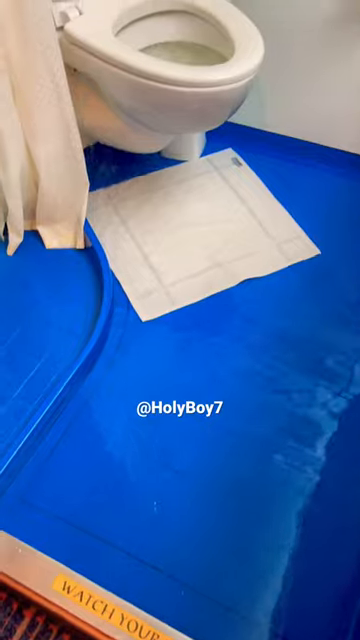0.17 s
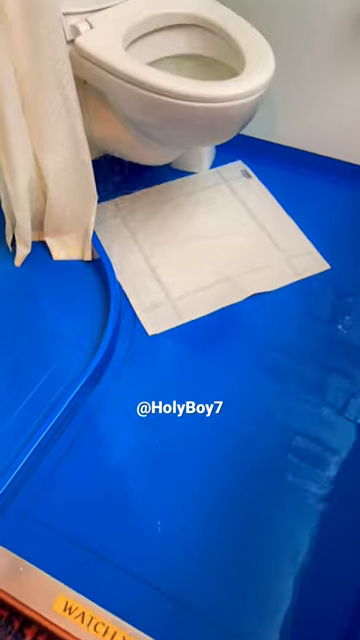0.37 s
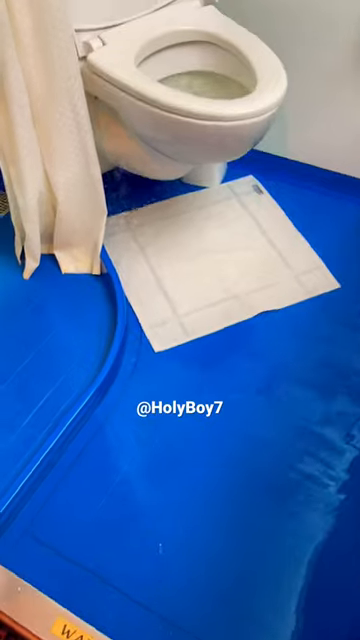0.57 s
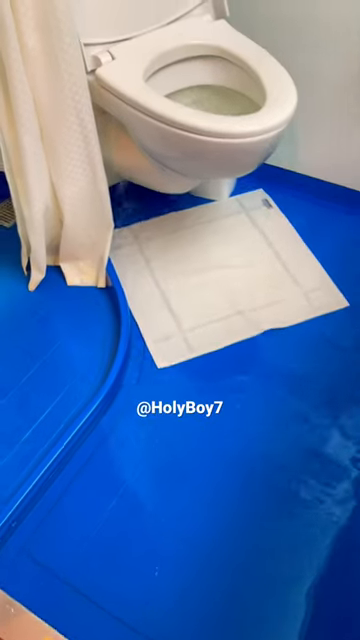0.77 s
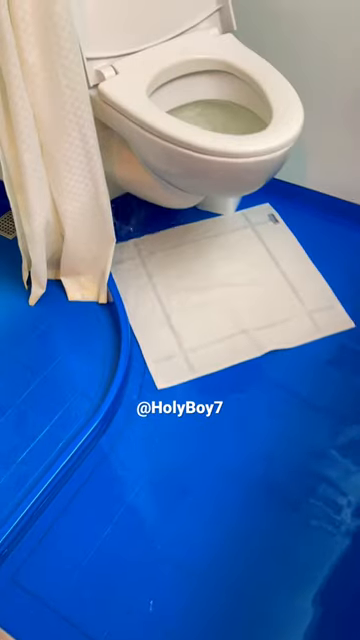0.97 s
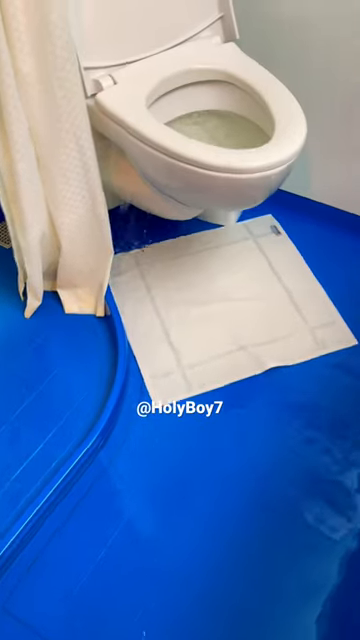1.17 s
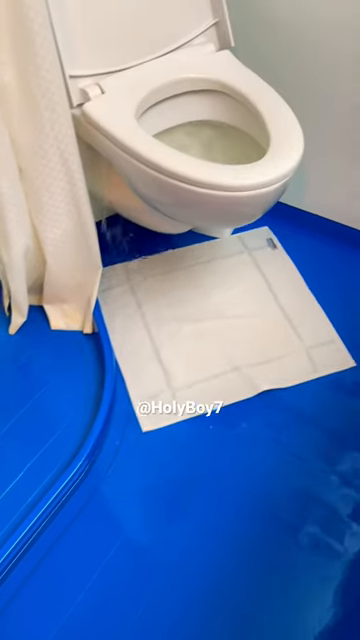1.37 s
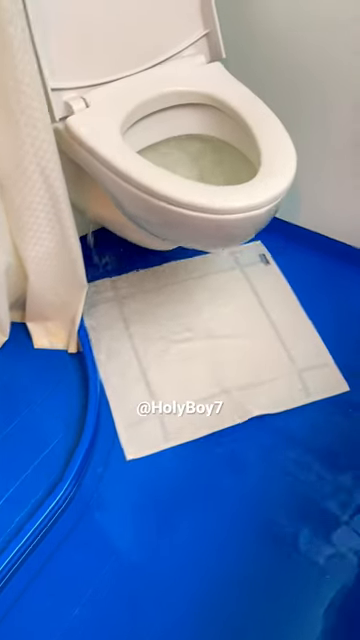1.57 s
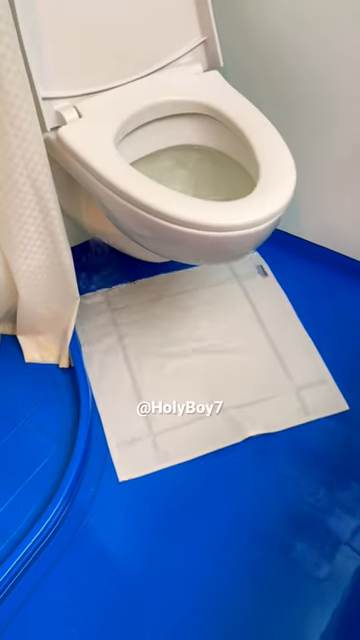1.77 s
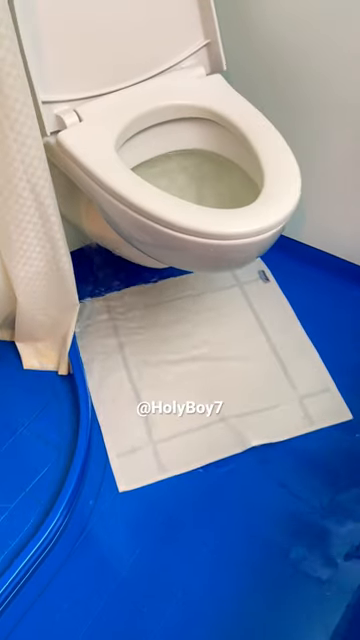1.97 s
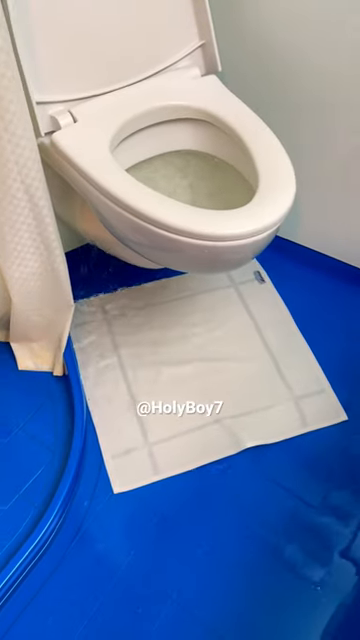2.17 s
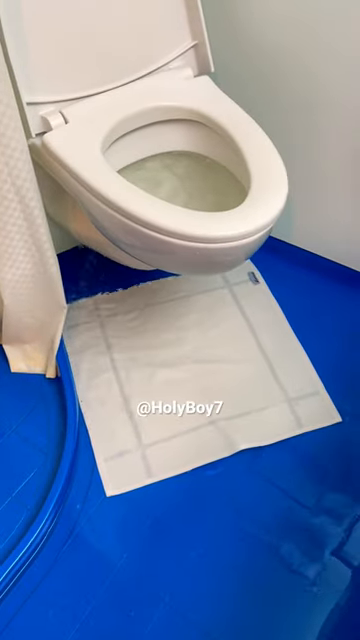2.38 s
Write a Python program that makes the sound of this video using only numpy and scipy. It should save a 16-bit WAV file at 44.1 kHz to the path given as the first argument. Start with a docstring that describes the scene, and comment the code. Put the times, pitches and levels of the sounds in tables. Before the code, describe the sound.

Overflowing toilet water hisses steadily, with bright drips, splats and bubbling glugs on a hard floor

```python
"""Water rushes into an overflowing toilet in a small, hard-walled bathroom, over a low rumble.
The inflow is coloured droplet clicks that hiss; noise rings in the bowl, and the filling pipe holds a hollow note.
The surface sloshes in surges of small rising tones, the bubbles, with a few deep glugs.
Spilled water drips as tones with ticks and splats as bursts of droplets; a close pair of microphone ports hears it.
"""
import sys
import numpy as np
from scipy import signal
from scipy.fft import rfft, irfft
from scipy.io import wavfile
from scipy.ndimage import uniform_filter1d

SR = 44100
rng = np.random.default_rng(int(sys.argv[2]) if len(sys.argv) > 2 else 0)


def generate_wav(sig):
    """Save sig (samples, or channels by samples) to the path in sys.argv[1] as 16-bit PCM at SR."""
    pcm = np.round(np.clip(np.atleast_2d(sig).T, -1, 1) * 32767).astype(np.int16)
    wavfile.write(sys.argv[1], SR, pcm)


N = 111132
T = np.arange(N) / SR
DRIP_RISE = 0.0033  # share of its pitch that a drip's tone rises per swell time


def undb(db):
    """Decibels to gain."""
    return 10 ** (np.asarray(db) / 20)


def unit(x):
    """Scale to rms 1."""
    return x / np.sqrt(np.mean(x ** 2) + 1e-18)


def follow(points):
    """A curve over time through (seconds, value) points."""
    seconds, values = np.array(points).T
    return np.interp(T, seconds, values)


def walk(rate):
    """Random levels held 1 / rate s, smoothed twice over that time and scaled to rms 1."""
    k = int(SR / rate)
    steps = np.repeat(rng.standard_normal(N // k + 1), k)
    return unit(uniform_filter1d(uniform_filter1d(steps, k), k)[:N])


def colour(x, points):
    """Filter x by a response of (Hz, dB) points, joined along log frequency."""
    hz, db = np.array(points).T
    f = np.fft.rfftfreq(len(x), 1 / SR)
    return irfft(rfft(x) * undb(np.interp(np.log(f + 1), np.log(hz), db)), len(x))


def ring(x, hz, width):
    """One resonance, its width in Hz."""
    return signal.lfilter(*signal.iirpeak(hz, hz / width, fs=SR), x)


def add(out, s, x):
    """Mix x into out at s seconds."""
    i = int(np.clip(s * SR, 0, N - 1))
    out[i:i + len(x)] += x[:N - i]


def patter(per_s, spread_db):
    """Random droplet clicks of either sign and uneven size, at rms 1."""
    hit = rng.random(N) < per_s / SR
    sign = rng.choice([-1, 1], N)
    size_db = spread_db * np.minimum(rng.exponential(size=N), 5)
    return unit(hit * sign * undb(size_db))


def bubble(hz, swell_s, rise):
    """A bubble's tone: swells to 1 in swell_s, dies away and rises in pitch."""
    t = np.arange(int(8 * swell_s * SR)) / SR
    u = t / swell_s
    envelope = (u * np.exp(1 - u)) ** 2
    return envelope * np.sin(2 * np.pi * hz * t * (1 + rise * u / 2))


def rumble():
    """Low noise, steady behind the water."""
    # Each row: frequency in Hz, density in dB.
    rumble_spectrum = [(15, -14), (36, -3), (52, -2.5), (75, -1.5), (110, -2.5), (200, -10), (300, -14.5),
                       (600, -40)]
    return undb(-47.5) * unit(colour(rng.standard_normal(N), rumble_spectrum))


def room(x):
    """The diffuse ring of the small room; its echoes keep changing as water and microphone move."""
    t60_s, step_s, onset_s = 0.33, 0.16, 0.00043
    t, out = T[:SR // 3], np.zeros(N)
    fade = undb(-60 * t / t60_s) * (1 - np.exp(-t / onset_s))
    # Overlapping pieces of sound each meet a fresh random response.
    for s in np.arange(0, T[-1] + step_s, step_s):
        near = np.abs(T - s) < step_s
        piece = x[near] * np.cos(np.pi / 2 * (T[near] - s) / step_s)
        response = rng.standard_normal(len(t)) * fade / np.sqrt(np.sum(fade ** 2))
        add(out, T[near][0], signal.fftconvolve(piece, response))
    return out


def hollow(hz, width):
    """Turbulence ringing in one hollow, at rms 1; two passes, each twice as wide as the given width."""
    noise = rng.standard_normal(N)
    return unit(ring(ring(noise, hz, 2 * width), hz, 2 * width))


def wavering(hz, width):
    """A narrow resonance that swells and fades at random while its pitch wanders; rms 1."""
    pitch_waver = 0.00798  # rms share of the pitch
    phase = 2 * np.pi * np.cumsum(hz * (1 + pitch_waver * walk(7))) / SR
    return unit(walk(width) * np.cos(phase) + walk(width) * np.sin(phase))


def bowl():
    """The bowl hums, building up at first; the filling pipe holds a hollow, beating note that swells and sinks."""
    # Resonances of the bowl. Each row: pitch in Hz, width in Hz, level in dB once built up.
    bowl_modes = [(167.5, 23.4, -45), (389.4, 56, -56.5), (633, 32, -56), (1101, 15, -55.5)]
    # Close resonances of the pipe. Each row: pitch in Hz, width in Hz, relative level in dB.
    pipe_modes = [(775.5, 28, -1.5), (748.5, 32, -3.5), (846, 50, -6.5)]
    # Swell of the pipe's note. Each row: time in seconds, gain in dB.
    pipe_level = [(0.04, -57), (0.45, -49.5), (0.68, -44.5), (0.98, -49), (1.15, -43), (1.38, -53),
                  (1.62, -43.5), (1.85, -46), (2.12, -42.5), (2.30, -45), (2.48, -42.5)]
    waver_db, build_db, build_s = 1, 7.5, 0.72
    hum = sum(hollow(hz, width) * undb(db + waver_db * walk(6.7)) for hz, width, db in bowl_modes)
    build_up = undb(-build_db * np.clip(1 - T / build_s, 0, 1))
    note = sum(wavering(hz, width) * undb(db) for hz, width, db in pipe_modes)
    return hum * build_up + note * undb(follow(pipe_level))


def splats():
    """Each slap of water bursts into droplets that thin out quickly; brightest near 11 kHz, steeply down above."""
    # Each row: start in seconds, centre in Hz, level in dB before its envelope and the overall tone, decay in seconds.
    splat_rows = [(0.488, 6540, -40, 0.014), (0.505, 8950, -24, 0.0048), (0.638, 10300, -38, 0.028),
                  (0.657, 9350, -29.5, 0.01), (0.862, 5560, -31.5, 0.0088), (0.921, 1490, -33, 0.004),
                  (0.944, 5060, -30.5, 0.021), (1.110, 3430, -34, 0.012), (1.113, 8650, -27.5, 0.0078),
                  (1.357, 4470, -31.5, 0.014), (1.427, 4230, -28.5, 0.012), (1.497, 2800, -35, 0.0099),
                  (1.569, 3200, -34.5, 0.011), (1.607, 3900, -31.5, 0.01), (1.760, 2500, -27.5, 0.0038),
                  (2.295, 5350, -32.5, 0.018), (2.317, 4870, -22.5, 0.0095)]
    # Overall tone of the splats. Each row: frequency in Hz, gain in dB.
    splat_tone = [(8000, 3.5), (11000, 5.5), (13500, -22)]
    relative_width, attack_s = 0.68, 0.0023
    out = np.zeros(N)
    for s, hz, db, decay_s in splat_rows:
        width = hz * relative_width
        burst = unit(ring(ring(patter(12000, 3.0), hz, width), hz, width))
        envelope = (1 - np.exp(-T / attack_s)) * np.exp(-T / decay_s)
        add(out, s, undb(db) * burst * envelope)
    return colour(out, splat_tone)


def trickle(slosh_db):
    """Small separate drops fall at random between the larger ones, louder in the surges."""
    drops_per_s, swell_cycles, low_hz, high_hz = 50, 2.16, 996, 4230
    top_db, range_db, surge_share = -34.5, 6.5, 0.28
    out = np.zeros(N)
    for when, size, strength in rng.random((int(drops_per_s * N / SR), 3)):
        hz = low_hz * (high_hz / low_hz) ** size
        drop = bubble(hz, swell_cycles / hz, DRIP_RISE)
        add(out, when * N / SR, undb(-range_db * strength) * drop)
    return out * undb(top_db + surge_share * slosh_db)


def splash(hz):
    """A drop breaks the surface: a crisp wide tick, then a ragged tail of droplets."""
    tick_db, tick_s, tick_width = -13, 0.00057, 1.0  # width as a share of the pitch
    tail_db, tail_s, tail_width, tail_per_s = -25, 0.02, 0.3, 1500
    t = T[:SR // 8]
    tick = unit(ring(rng.standard_normal(len(t)), hz, hz * tick_width)) * np.exp(-t / tick_s)
    droplets = patter(tail_per_s, 2.7)[:len(t)]
    tail = unit(ring(droplets, hz, hz * tail_width)) * np.exp(-t / tail_s)
    return undb(tick_db) * tick + undb(tail_db) * tail


def drips():
    """Drips into standing water splash and plink briefly."""
    # Each row: start in seconds, pitch in Hz, peak of the tone in dB.
    drip_rows = [(0.0717, 2200, -19.5), (0.081, 2110, -29), (0.1675, 2520, -23.5), (0.2525, 1500, -33),
                 (0.2939, 2630, -25.5), (0.388, 2580, -29), (0.4576, 2370, -22), (0.4972, 2580, -22),
                 (0.517, 2550, -44), (0.612, 1130, -41), (0.657, 2400, -28), (0.704, 2380, -31),
                 (0.719, 2680, -24.5), (0.796, 2390, -25.5), (0.8015, 2370, -25), (0.9194, 2250, -27),
                 (1.2827, 2340, -24), (1.4277, 3980, -30), (1.4623, 2420, -28), (1.4936, 1410, -28),
                 (1.502, 1700, -33), (1.514, 1990, -33), (1.5654, 2220, -28.5), (1.6078, 3980, -32),
                 (1.616, 3900, -33), (1.6448, 1960, -27.5), (1.6659, 2240, -25), (1.683, 1770, -25),
                 (1.689, 1930, -30), (1.7112, 3720, -26), (1.7579, 3050, -26.5), (2.0266, 1420, -27.5),
                 (2.079, 3190, -20.5), (2.2492, 1460, -30), (2.2902, 1350, -32), (2.318, 2490, -24.5),
                 (2.3183, 5480, -17.5), (2.512, 2690, -17)]
    swell_s = 0.00086
    out = np.zeros(N)
    for s, hz, db in drip_rows:
        add(out, s, undb(db) * bubble(hz, swell_s, DRIP_RISE))
        add(out, s, undb(db) * splash(hz))
    return out


def glugs():
    """Large air bubbles gulp with a slower swell and shed smaller, higher ones."""
    # Each row: start in seconds, pitch in Hz, peak in dB, cycles to swell.
    glug_rows = [(0.040, 1026, -26.5, 2), (0.072, 2050, -26.5, 6.7), (0.095, 2020, -42, 17.4),
                 (0.166, 1207, -31.5, 6.7), (0.845, 563, -26, 2.1), (0.869, 790, -26, 2.1),
                 (0.920, 1040, -23, 2.5), (0.928, 1200, -28.5, 2.3), (0.939, 1040, -40, 2.5),
                 (0.984, 269, -31, 1.1), (0.992, 201, -33, 0.86), (0.998, 99, -30, 0.5),
                 (1.278, 1100, -31, 3.6), (1.449, 373, -36, 6.3), (1.517, 620, -32, 2.1),
                 (1.530, 525, -34.5, 2.3), (1.543, 655, -30, 1.9), (1.640, 360, -34, 4.2),
                 (1.721, 321, -36, 3.4), (1.760, 318, -39, 3.8), (1.852, 170, -36.5, 1.7),
                 (1.912, 589, -34, 6.2), (2.255, 451, -36, 5.1), (2.326, 364, -29.5, 2.8)]
    pitch_rise = 0.024  # share of the pitch per swell time
    shed_db, shed_s, shed_rise = -16.5, 0.039, 0.338  # relative level, longest delay, largest rise in pitch
    out = np.zeros(N)
    for s, hz, db, cycles in glug_rows:
        add(out, s, undb(db) * bubble(hz, cycles / hz, pitch_rise))
        for late in rng.uniform(0.1967, 1, size=3):
            small_hz = hz * (1 + shed_rise * late)
            small = bubble(small_hz, cycles / small_hz, pitch_rise)
            add(out, s + shed_s * late, undb(db + shed_db) * small)
    return out


def swarm(per_s, low_hz, high_hz):
    """Random bubbles between two pitches, each a short rising tone; they come in spurts."""
    mean_cycles, spread_db, pitch_rise, spurt_db = 8.2, -0.5, 0.088, 3
    out, spurts = np.zeros(N), undb(spurt_db * walk(35.6))
    for when, size, strength, life in rng.random((int(per_s * N / SR), 4)):
        hz = low_hz + (high_hz - low_hz) * size ** 1.376  # leans towards the low pitches
        ring_s = mean_cycles * (.5 + life) / hz
        # Dividing by the root of the ring time evens out the energy.
        gain = undb(spread_db * min(-np.log(1 - strength), 3)) / np.sqrt(ring_s)
        t = np.arange(int(2 * ring_s * SR)) / SR
        fade = np.exp(-np.e * t / ring_s) * (1 - np.exp(-2 * hz * t))
        tone = np.sin(2 * np.pi * hz * t * (1 + pitch_rise * t / ring_s / 2))
        add(out, when * N / SR, gain * fade * tone)
    return unit(out) * spurts


def sloshing(slosh_db):
    """Small bubbles fizz with each surge; larger ones churn on a level curve of their own."""
    # Sound of the small bubbles. Each row: frequency in Hz, gain in dB.
    fizz_spectrum = [(250, -20), (500, 16.5), (900, 2), (1500, -8), (2400, -6), (4000, 2.5), (6000, -0.5),
                     (9000, 1), (14000, -28)]
    # Churning of larger bubbles. Each row: time in seconds, gain in dB.
    churn_level = [(0.04, -41), (0.12, -51), (0.18, -57), (0.36, -49), (0.55, -56), (0.78, -47),
                   (0.86, -35.5), (0.90, -59), (0.93, -39), (1.04, -67), (1.24, -59), (1.29, -45),
                   (1.39, -60), (1.47, -43), (1.56, -45), (1.68, -47), (1.84, -49.5), (2.01, -51),
                   (2.19, -56), (2.33, -41.5), (2.42, -69)]
    fizz_db = -41  # before the surges
    fizz = unit(colour(swarm(500, 1097, 8060), fizz_spectrum)) * undb(fizz_db + slosh_db)
    churn = swarm(300, 402.5, 2417) * undb(follow(churn_level))
    return fizz + churn


def inflow(slosh_db):
    """Fine spray hisses, fluttering and swelling a little with the surges."""
    # Each row: frequency in Hz, density in dB.
    hiss_spectrum = [(250, 0), (500, 1), (1000, 6), (1600, -3.5), (2500, -1), (4000, 0.5), (5500, 1.5),
                     (7000, 5.5), (8800, 7.5), (10800, 7.5), (12300, -3.5), (14500, -21)]
    hiss_db, flutter_db, surge_share = -35.5, 0.79, 0.16  # hiss level before flutter and surges
    spray = unit(colour(patter(9000, 0.5), hiss_spectrum))
    flutter = flutter_db * (walk(18) + 2.9 * walk(70))  # the quick part is the stronger
    return spray * undb(hiss_db + flutter + surge_share * slosh_db)


def ports(front, across):
    """The sum and difference of the two ports trade places as their phase turns with frequency."""
    # Phase between the ports. Each row: frequency in Hz, phase in radians.
    port_phase = [(0, 0), (200, -.16), (400, -.55), (650, -1.15), (950, -1.3), (1170, -1.7), (1400, -.7),
                  (1850, 0), (2400, .8), (3000, 1.4), (4000, 1.3), (4900, 3.14), (5400, 5.3), (6000, 6.28),
                  (7000, 7.4), (8000, 8.6), (9000, 9.42), (10000, 10.2), (11000, 11.2), (12200, 12.5),
                  (14000, 12.8), (15500, 15)]
    # Part of their difference that follows the front sound. Each row: frequency in Hz, share from 0 to 1.
    port_share = [(200, .45), (800, .45), (1200, .1), (3300, .2), (4500, .45), (7000, .72), (11000, .72)]
    f = np.fft.rfftfreq(N, 1 / SR)
    half = np.interp(f, *np.array(port_phase).T) / 2
    share = np.interp(f, *np.array(port_share).T)
    mid = irfft(rfft(front) * np.cos(half), N)
    difference = 1j * share * rfft(front) + np.sqrt(1 - share ** 2) * rfft(across)
    side = irfft(difference * np.sin(half), N)
    return np.array([mid + side, mid - side])


def scene():
    """All the water, one near wall and the room, over the rumble."""
    # Strength of the sloshing. Each row: time in seconds, level in dB.
    slosh_level = [(0.04, -8.5), (0.18, 0), (0.25, -4), (0.31, -3), (0.40, -22), (0.50, 4), (0.57, -12),
                   (0.70, -1), (0.86, -2), (0.96, 4.5), (1.04, -3), (1.23, -4.5), (1.48, -1.5), (1.68, 4),
                   (1.90, -5.5), (2.05, -2), (2.18, -12.5), (2.33, -0.5), (2.42, 0.5), (2.52, -5)]
    wall_s, wall_db, room_front_db, room_across_db = .009, -19, -2.5, 0.5
    slosh_db = follow(slosh_level)
    water = inflow(slosh_db) + sloshing(slosh_db)
    spills = drips() + glugs() + splats() + trickle(slosh_db)
    wall = undb(wall_db) * np.interp(T - wall_s, T, spills, left=0)  # one echo of the spills
    direct = undb(-1.56) * water + spills
    front = direct + wall + undb(room_front_db) * room(direct) + bowl() + rumble()
    across = undb(room_across_db) * room(direct) + bowl()  # drawn afresh, so unlike the front
    return ports(front, across)


def record(dry):
    """The sound starts after a moment of silence; the top is cut steeply."""
    start_s, top_hz = .036, 14600
    steep_cut = signal.ellip(8, .2, 80, top_hz, fs=SR, output="sos")
    return signal.sosfilt(steep_cut, dry * (T >= start_s))


dry = scene()
out = record(dry)
generate_wav(out)
```